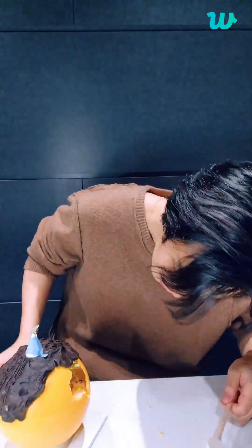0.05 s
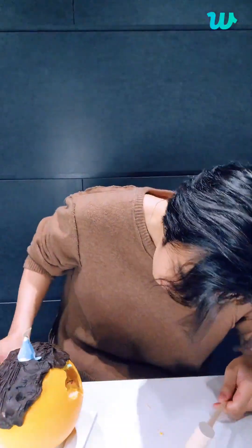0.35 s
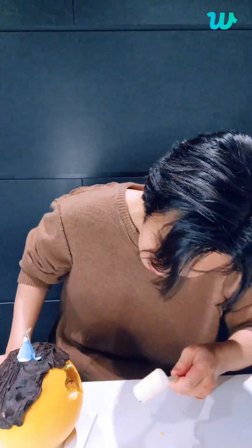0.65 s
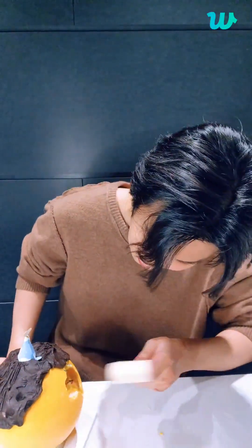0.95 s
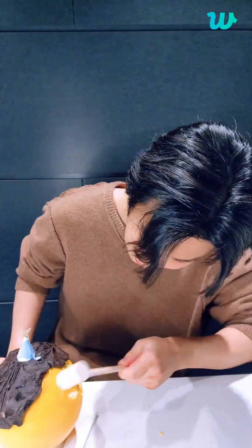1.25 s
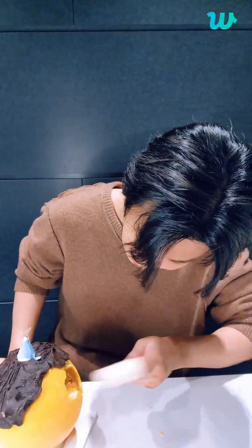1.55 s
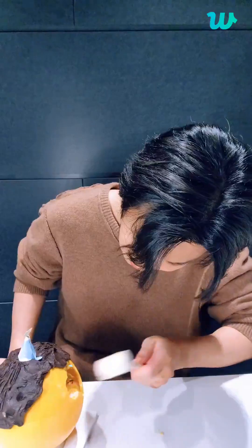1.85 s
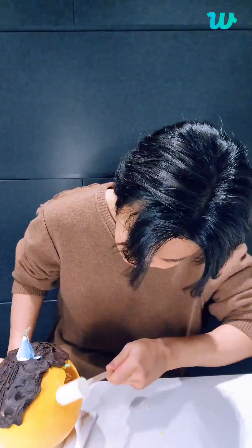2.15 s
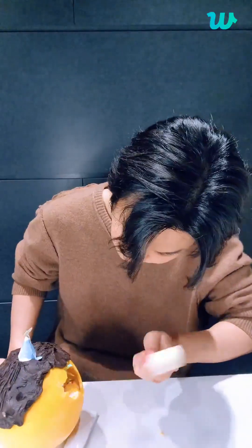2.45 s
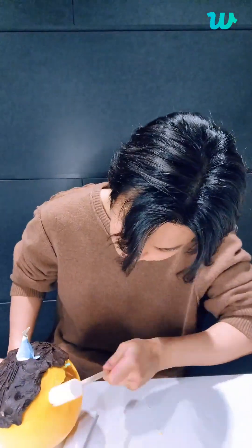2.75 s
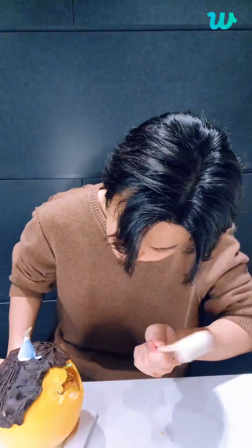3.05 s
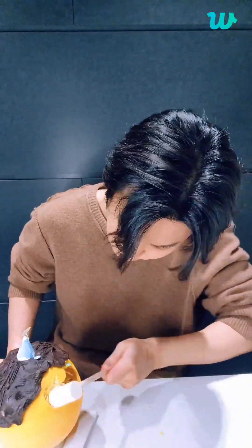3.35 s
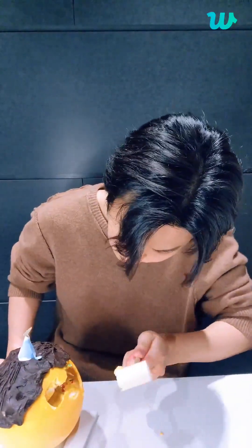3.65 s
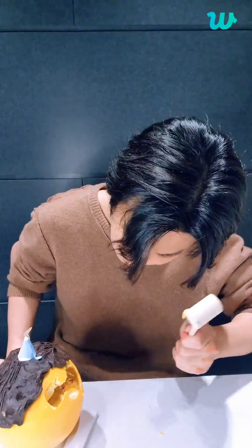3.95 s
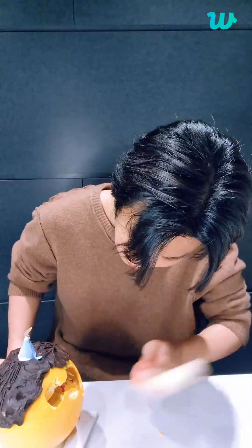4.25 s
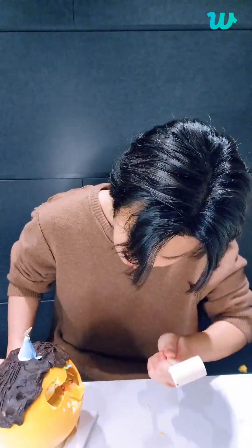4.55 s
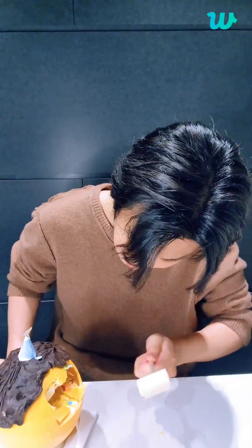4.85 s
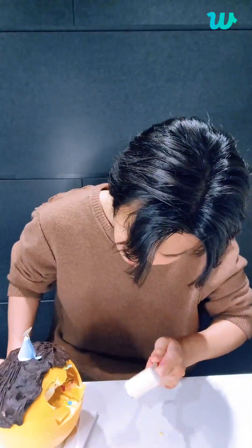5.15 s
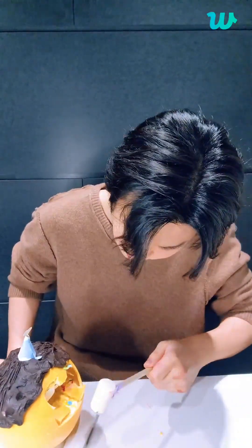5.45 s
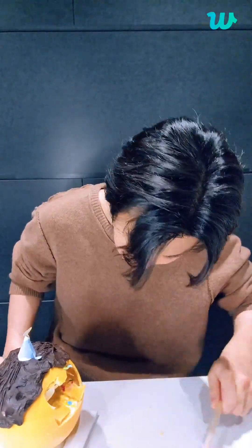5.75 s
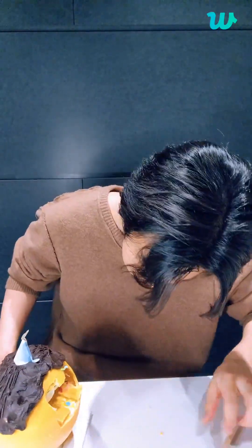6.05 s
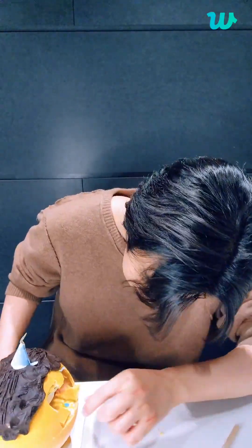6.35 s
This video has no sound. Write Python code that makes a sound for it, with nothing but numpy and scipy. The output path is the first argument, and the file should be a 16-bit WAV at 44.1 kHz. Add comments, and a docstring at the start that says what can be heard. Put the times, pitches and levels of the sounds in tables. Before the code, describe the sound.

A small mallet cracks a hollow, brittle cake shell with quick crunching taps, then clatters onto a table.

```python
"""Ventilation hums in a live room; a hand brushes over a table, taking up a small mallet.
Close to the microphone, 14 fast blows strike a hollow, brittle cake shell: each is a crunching
contact that sets shell and table booming. A single knock follows, three chips tick down, and a
last blow breaks through and lands twice. The mallet is dropped on the table and clatters, its
thin handle pinging, as the hand brushes away."""
import sys
import numpy as np
from scipy import signal
from scipy.fft import rfft, irfft, next_fast_len
from scipy.io import wavfile
from scipy.ndimage import uniform_filter1d

SR = 44100
rng = np.random.default_rng(int(sys.argv[2]) if len(sys.argv) > 2 else 0)


def to_wav(sig):
    """Store sig (one row per channel, or 1-D mono) as 16-bit WAV at the path in sys.argv[1].

    Samples outside -1..1 are clipped; the rate is SR.
    """
    pcm = np.clip(np.atleast_2d(sig), -1, 1) * 32767
    pcm = np.round(pcm).astype(np.int16)
    wavfile.write(sys.argv[1], SR, pcm.T)  # frames by channels


N = 291501
TIME_S = np.arange(N) / SR

# Air noise. Each row: frequency in Hz, relative density in dB.
AIR_SPECTRUM = [(25, -16.5), (45, -9), (64, -3.5), (97, -19.5), (125, -6.5), (185, -4), (215, -13),
                (300, -7.5), (440, -17.5), (560, -20), (714, -14.5), (1020, -26), (1840, -35.5),
                (3000, -53.5), (8000, -58), (12300, -58.5), (16000, -51)]
# Air noise. Each row: time in seconds, level in dB.
AIR_LEVEL = [(0, -50), (.9, -50), (4, -53.5), (5.1, -51), (6.61, -49.5)]
# Fan tones. Each row: frequency in Hz, level in dB.
FAN_TONES = [(121.4, -56), (74.7, -67)]
# Room decay. Each row: frequency in Hz, T60 in seconds.
ROOM_T60 = [(100, 0.6), (260, .5), (700, 0.6143), (1840, 0.406), (4850, 0.3665), (12800, 0.2667)]
# Room tail. Each row: frequency in Hz, energy against the input in dB.
ROOM_TAIL = [(70, -6), (160, 6), (270, 3.5), (400, 5.5), (1000, 1), (2200, -2.7), (4200, -2), (7500, -2),
             (12500, -6.5)]
# First reflections. Each row: delay in seconds, gain in dB.
REFLECTIONS = [(.0062, -18), (0.0114, -14.5)]
# Hand strokes. Each row: start in seconds, length in seconds, level in dB.
STROKES = [(0.17, 0.13, -52.5), (0.66, 0.044, -68), (6.14, 0.19, -57.5)]
# Hand friction. Each row: frequency in Hz, relative density in dB.
FRICTION_SPECTRUM = [(100, 3.5), (400, 2.5), (1000, 0), (2000, 1), (7800, -1.5), (11600, -1), (16000, -3)]
# Contact band edges in Hz. The bands: boom, thud, knock, clack, crack, crunch, snap.
EDGES_HZ = [100, 230, 650, 1600, 3000, 5600, 9500, 16000]
# Falling chips. Each row: start in seconds, gain in dB.
CHIPS = [(4.614, -48), (4.6985, -58), (4.7733, -45)]
# Mallet bounces, duller if glancing. Each row: start in seconds, gain in dB, dulling in dB per octave.
BOUNCES = [(5.94, -0.5, 0), (5.9486, 0, 7.5), (6.0268, -2, 4.5), (6.0843, -7, 3), (6.1182, -10, 2),
           (6.1862, -5.5, 7)]
# Mallet square on the table: level in dB per band, thud to snap.
TABLE_CONTACT_DB = [-23, -9.5, -5.5, -3, -21.5, -19.5]
# Table top. Each row: frequency in Hz, lift in dB, width in octaves.
TABLE_RESONANCES = [(337, 7.5, 0.14), (870, 4, 0.17), (1150, 3.5, 0.14), (2340, 3.5, .08)]
# Loose mallet on the table. Each row: frequency in Hz, relative level in dB, T60 in seconds.
MALLET_MODES = [(326, -8, 0.28), (349, 5.5, 0.11), (587, -11, 0.3), (727, -20.5, 0.43), (830, -21, 0.23),
                (940, -18.5, .35), (980, -15, 0.49), (960, -26, 0.26), (1170, -24, 0.24), (1310, -37, 0.35),
                (1547, -21, 0.44), (2174, -29, 0.3), (3265, -20, .3)]
# Handle slapping down. Each row: start in seconds, drive in dB.
HANDLE_SLAPS = [(6.1174, -29), (6.185, -40)]
# Thin handle. Each row: frequency in Hz, relative level in dB, T60 in seconds.
HANDLE_MODES = [(6220, 1, 0.02), (6160, -8, 0.036), (10320, 0.5, 0.015)]
# Blows on the shell. Each row: start in seconds, strength in dB, give in dB, splintering in dB,
# pitch of the struck piece in Hz, its lift in dB before PIECE_SHAPE.
BLOWS = [(0.9329, 2.7, -4.5, 3.5, 1270, 4), (1.1528, 1, 1.5, 1, 1860, 1.5),
         (1.3521, 0.5, -10, 4.5, 4950, 10), (1.5449, 0, -8, 4.5, 4850, 9), (1.7432, 1.5, -5, -3, 2520, 3),
         (1.9164, 1.5, -4, -4, 2120, 3), (2.1027, -1.6, -1.5, 0.2, 4000, 8.5),
         (2.2956, -3.5, 1.5, 4.5, 2130, 3.5), (2.4975, 1.2, 2.5, -4, 3540, 7),
         (2.6896, 1, -0.5, -1.5, 2330, 7), (2.885, 0, -1.5, 0, 5900, 2), (3.0819, -3, 6, 4, 1440, 6.5),
         (3.2861, 3.5, -11, 1.7, 1590, 5.5), (3.4838, -1, 7, 0.5, 1313, 8.5),
         (4.4383, -5.5, 12, -1.5, 3850, 6), (4.827, -4.5, 3, -11.5, 1130, 3),
         (4.8305, -9, -8, 5, 3750, 9.5)]
# Average blow: level in dB per band, boom to snap.
SHELL_CONTACT_DB = [-22.5, -19, -21, -19.5, -19.5, -23.5, -16]
# Share of the give per band, 0 to 1; mostly thud.
GIVE_SHARE = [0.23, .65, 0.31, 0.075, 0, 0.14, 0.17]
# Share of the splintering per band, 0 to 1; mostly crunch and snap.
SPLINTER_SHARE = [0.16, 0.23, 0, 0.014, 0, 0.75, 0.98]
# Shell wall. Each row: frequency in Hz, lift in dB, width in octaves.
WALL_RESONANCES = [(1170, 2, .18), (3380, 1.5, 0.12), (4400, 1, 0.16)]
# Struck piece: broad skirt, narrow top. Each row: share of the lift, width in octaves.
PIECE_SHAPE = [(0.64, 0.58), (0.2, 0.055)]
# How squarely the struck part faces the microphone. Each row: time in seconds, facing score.
FACING = [(.93, -6), (1.55, -8), (2.3, 7.5), (2.5, 3.5), (2.7, 0), (3.29, -2), (3.48, -8), (4.44, 6),
          (4.83, 2.5)]
# Hollow shell on its table. Each row: frequency in Hz, relative level in dB, T60 in seconds.
SHELL_MODES = [(118.1, -13, 0.83), (127, -18.5, .4), (167.4, -25.5, 0.96), (180.4, -3.5, 0.65),
               (200.8, -10.5, .4), (227.3, -11, 0.61), (272.5, -19.5, 0.54), (289.4, -17.5, 0.61),
               (313, -12.5, 0.5), (349.7, -6, 0.35), (383, -16.5, 0.45), (392.5, -13.5, 0.31),
               (487, -11.5, 0.35), (509.3, -13, 0.17), (609, -20.5, 0.32), (629.5, -13, 0.18),
               (684, -16.5, 0.5), (730, -25.5, 0.58), (1152, -20.5, 0.37), (1420, -18, .3)]
# Small microphone. Each row: frequency in Hz, gain in dB.
MIC_RESPONSE = [(4800, 0.5), (6000, -1.5), (7500, -2), (9000, 1), (10000, -0.5), (12200, 5.5), (13600, -2),
                (15500, -2.5)]


def amp(db):
    """Decibels to gain."""
    return 10 ** (np.asarray(db) / 20)


def unit(x):
    """Scale to unit energy."""
    return x / np.sqrt(np.sum(x ** 2) + 1e-20)


def at_hz(points, hz):
    """Interpolate over log frequency."""
    knots_hz, values = np.transpose(points)
    return np.interp(np.log(np.maximum(hz, 1)), np.log(knots_hz), values)


def centres(edges_hz):
    """Geometric band centres."""
    return np.sqrt(np.multiply(edges_hz[1:], edges_hz[:-1]))


def band(x, low_hz, high_hz, order=2):
    """Causal band-pass."""
    return signal.sosfilt(signal.butter(order, [low_hz, high_hz], "band", fs=SR, output="sos"), x)


def minimum_phase(gain_db, size):
    """Causal frequency response for a gain curve."""
    cepstrum = irfft(np.log(amp(gain_db)), size)
    cepstrum[1:size // 2] *= 2
    cepstrum[size // 2 + 1:] = 0
    return np.exp(rfft(cepstrum))


def add(track, start_s, sound):
    """Mix a sound into a track."""
    at = int(round(start_s * SR))
    track[at:at + len(sound)] += sound[:N - at]


def noise(spectrum):
    """Shaped noise, unit rms."""
    hz = np.arange(N // 2 + 1) * SR / N
    shaped = irfft(rfft(rng.standard_normal(N)) * amp(at_hz(spectrum, hz)), N)
    return shaped / shaped.std()


def ventilation(waver_rad=0.297):
    """Dull air noise and a fan hum of wandering phase."""
    knots_s = np.linspace(0, TIME_S[-1], 40)
    hum = np.zeros(N)
    for hz, db in FAN_TONES:
        drift_rad = waver_rad * np.interp(TIME_S, knots_s, rng.standard_normal(len(knots_s)))
        hum += amp(db) * np.sqrt(2) * np.sin(2 * np.pi * hz * TIME_S + drift_rad)
    return noise(AIR_SPECTRUM) * amp(np.interp(TIME_S, *np.transpose(AIR_LEVEL))) + hum


def room(x, gap_s=0.0026, build_s=0.0062):
    """Two reflections and a diffuse tail that dies sooner in the treble."""
    t = TIME_S[:SR * 3 // 4]
    build = 1 - np.exp(-np.maximum(t - gap_s, 0) / build_s)
    edges_hz = np.geomspace(50, 18000, 22)
    response = np.zeros(len(t))
    for low_hz, high_hz, hz in zip(edges_hz, edges_hz[1:], centres(edges_hz)):
        decay = amp(-60 * t / at_hz(ROOM_T60, hz))
        tail = band(rng.standard_normal(len(t)), low_hz, high_hz, order=3) * build * decay
        response += unit(tail) * np.sqrt(2 * (high_hz - low_hz) / SR) * amp(at_hz(ROOM_TAIL, hz))
    for delay_s, db in REFLECTIONS:
        add(response, delay_s, np.array([amp(db)]))
    return signal.fftconvolve(x, response)[:N]


def brushing_hand(attack_s=0.049, sag_db_per_s=43, release_db_per_s=350):
    """Friction noise: each stroke swells, slackens and dies as the hand lifts."""
    envelope = np.zeros(N)
    t = TIME_S[:SR]
    for start_s, length_s, db in STROKES:
        fall_db = sag_db_per_s * t + release_db_per_s * np.maximum(t - length_s, 0)
        add(envelope, start_s, np.minimum(t / attack_s, 1) * amp(db - fall_db))
    return envelope * noise(FRICTION_SPECTRUM)


def contact(levels_db, edges_hz, crumble, crumble_s, rattle, rattle_s, resonances=(), size=4096):
    """A sharp push, a burst of tiny fractures and a brief rattle. Band levels: rms over 1 ms."""
    t = TIME_S[:size]
    hz = np.maximum(np.arange(size // 2 + 1) * SR / size, 1)
    envelope = crumble * np.exp(-t / crumble_s) + rattle * np.exp(-t / rattle_s)
    force = rng.standard_normal(size) * envelope
    force[0] += 1  # the push
    spectrum = rfft(unit(force))
    density_db = levels_db + 10 * np.log10(SR * 1e-3 * SR / 2 / np.diff(edges_hz))
    colour_db = at_hz(np.column_stack([centres(edges_hz), density_db]), hz)
    colour_db -= 10 * np.log10(1 + (edges_hz[0] / hz) ** 10)  # a small body radiates little bass
    for peak_hz, lift_db, width_oct in resonances:
        colour_db += lift_db * np.exp(-(np.log2(hz / peak_hz) / width_oct) ** 2)
    # A brittle break is even across each band: flatten the ripple.
    ripple_db = 10 * np.log10(uniform_filter1d(np.abs(spectrum) ** 2, size=9) + 0.02)
    return irfft(spectrum * minimum_phase(colour_db - ripple_db, size), size)


def mode_drive_db(modes, levels_db, edges_hz):
    """A contact's level at each mode's frequency."""
    return at_hz(np.column_stack([centres(edges_hz), levels_db]), np.array(modes)[:, 0])


def ring(modes, drive_db, scatter_db):
    """Damped sines; each hit lands elsewhere, so mode levels scatter."""
    hz, db, t60_s = np.transpose(modes)[:, :, None]
    t = TIME_S[:SR * 2 // 3]
    onset_db = db + np.reshape(drive_db, (-1, 1)) + scatter_db * rng.standard_normal(db.shape)
    return np.sum(amp(onset_db - 60 * t / t60_s) * np.sin(2 * np.pi * hz * t), axis=0)


def falling_chips():
    """Light fragments crumble with only a bright tick."""
    ticks = np.zeros(N)
    tick_db = np.array([-22, -22, -3, -2.5, -3.5, 1])  # thud to snap
    for start_s, db in CHIPS:
        tick = contact(db + tick_db, EDGES_HZ[1:], crumble=0.8, crumble_s=0.001,
                       rattle=0.13, rattle_s=0.0044)
        add(ticks, start_s, tick)
    return ticks


def dropped_mallet():
    """Head and handle bounce and chatter on the table, too light to make it boom."""
    hits, ringing = np.zeros((2, N))
    edges_hz = EDGES_HZ[1:]
    octaves = np.log2(centres(edges_hz) / centres(edges_hz)[0])
    for start_s, gain_db, dulling_db_per_oct in BOUNCES:
        levels_db = np.array(TABLE_CONTACT_DB) + gain_db - dulling_db_per_oct * octaves
        hit = contact(levels_db, edges_hz, crumble=0.93, crumble_s=0.0043,
                      rattle=0.21, rattle_s=0.0068, resonances=TABLE_RESONANCES)
        add(hits, start_s, hit)
        drive_db = mode_drive_db(MALLET_MODES, levels_db, edges_hz)
        add(ringing, start_s, ring(MALLET_MODES, drive_db, scatter_db=5.5))
    for start_s, drive_db in HANDLE_SLAPS:
        add(hits, start_s, ring(HANDLE_MODES, drive_db, scatter_db=5))
    return hits, band(ringing, 260, 8000)


def shell_blows(spot_count=4, break_s=0.00072, weakening_s_per_blow=0.00003, knock_hz=513):
    """Brittle contacts on a few spots in turn ring the hollow shell; breaks lengthen as it weakens."""
    direct, ringing = np.zeros((2, N))
    room_sends = np.zeros((spot_count, N))
    for k, (start_s, strength_db, give_db, splinter_db, piece_hz, piece_db) in enumerate(BLOWS):
        levels_db = np.array(SHELL_CONTACT_DB) + strength_db
        levels_db += give_db * np.array(GIVE_SHARE) + splinter_db * np.array(SPLINTER_SHARE)
        piece = [(piece_hz, share * piece_db, width_oct) for share, width_oct in PIECE_SHAPE]
        knock = (knock_hz, 0.66 * give_db, 0.28)  # a wall that gives knocks at its own pitch
        hit = contact(levels_db, EDGES_HZ, crumble=0.64, crumble_s=break_s + k * weakening_s_per_blow,
                      rattle=0.23, rattle_s=0.0026, resonances=[*WALL_RESONANCES, *piece, knock])
        facing = np.interp(start_s, *np.transpose(FACING))  # more to the microphone, less to the room
        add(direct, start_s, amp(0.32 * facing) * hit)
        add(room_sends[k % spot_count], start_s, amp(-0.33 * facing) * hit)
        drive_db = mode_drive_db(SHELL_MODES, levels_db, EDGES_HZ)
        add(ringing, start_s, ring(SHELL_MODES, drive_db, scatter_db=1.7))
    return direct, room_sends, band(ringing, 150, 4000)


def scene():
    """Contacts, direct and through the room, over ringing bodies and ventilation. Mono."""
    taps, room_sends, shell_ring = shell_blows()
    clatter, mallet_ring = dropped_mallet()
    faint = falling_chips() + brushing_hand()
    direct = amp(2.5) * taps + amp(-1.5) * clatter + faint
    reverb = sum(room(send) for send in [*room_sends, clatter + faint])  # each has its own paths
    bodies = amp(-0.45) * shell_ring + amp(-3.5) * mallet_ring
    return (direct + reverb + bodies + ventilation())[None]


def record(dry, ceiling=0.33, low_cut_hz=48, high_cut_hz=15900):
    """Microphone colour, soft clipping, then rumble and top cut."""
    size = 2 * next_fast_len(N)
    hz = np.arange(size // 2 + 1) * SR / size
    response = minimum_phase(at_hz(MIC_RESPONSE, hz), size)
    coloured = irfft(rfft(dry, size) * response, size)[:, :N]
    rounded = ceiling * np.tanh(coloured / ceiling)
    high_pass = signal.butter(2, low_cut_hz, "high", fs=SR, output="sos")
    low_pass = signal.ellip(10, 0.2, 80, high_cut_hz, fs=SR, output="sos")
    return signal.sosfilt(low_pass, signal.sosfilt(high_pass, rounded))


dry = scene()
out = record(dry)
to_wav(out)
```